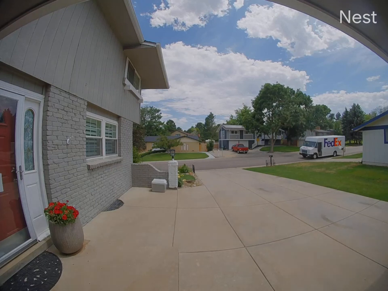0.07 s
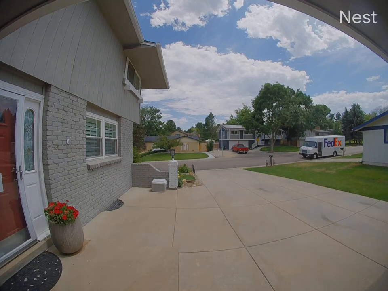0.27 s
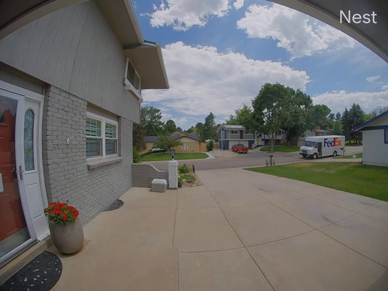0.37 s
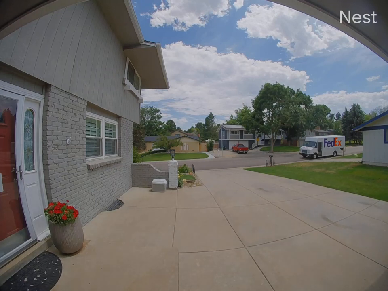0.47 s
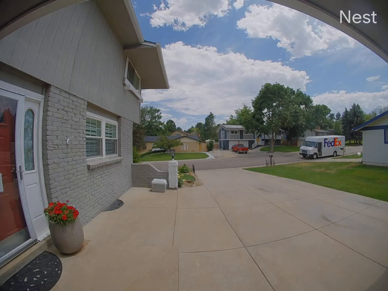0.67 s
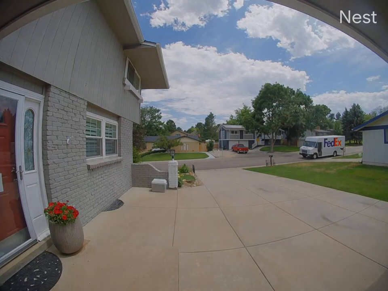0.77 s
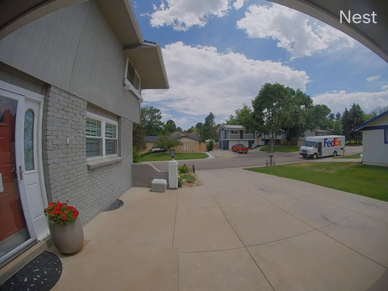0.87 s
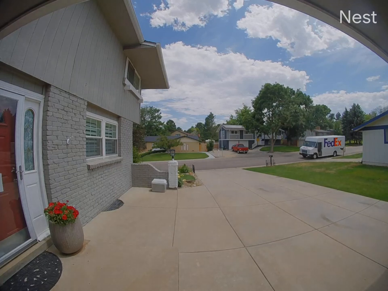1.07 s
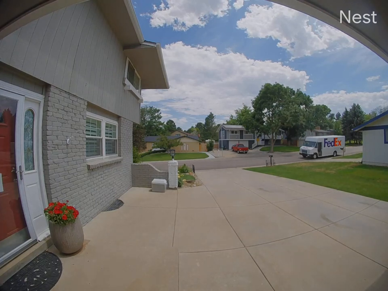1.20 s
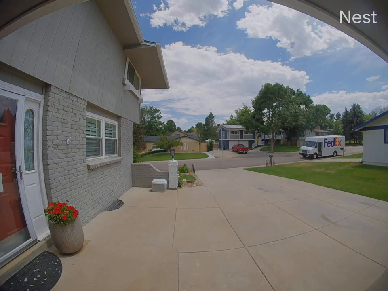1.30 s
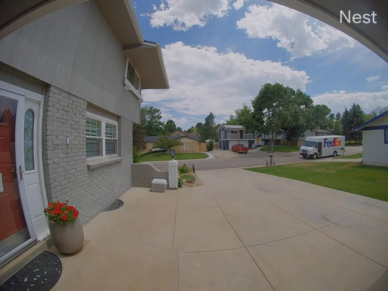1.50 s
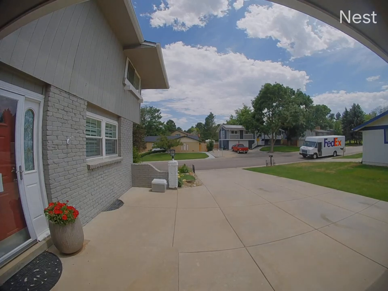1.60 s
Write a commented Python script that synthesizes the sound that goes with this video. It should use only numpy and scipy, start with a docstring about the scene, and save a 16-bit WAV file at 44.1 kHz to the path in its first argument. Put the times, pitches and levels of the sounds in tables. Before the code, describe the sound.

A package drops with a sharp, hollow thud near a house entrance, after a quick run of dull knocks; weaker bumps and short scuffs follow over low outdoor rumble, heard by a small doorway microphone.

```python
"""A package lands with a sharp thud near a house, heard by a small microphone at the front door.
Dull knocks, short swelling tones that excite a hollow body, build up to the hit; weaker ones follow.
The hit adds cracks of grainy noise, a thin ring of decaying modes and a smooth wash of early reflections,
made from filtered noise; scuffs are friction noise. The walls return a diffuse tail of decaying noise,
over an uneven low rumble and faint hiss of filtered noise."""
import sys
import numpy as np
from scipy import signal
from scipy.fft import rfft, irfft
from scipy.io import wavfile
from scipy.ndimage import uniform_filter1d

SR = 44100
rng = np.random.default_rng(int(sys.argv[2]) if len(sys.argv) > 2 else 0)


def transcribe(u):
    """Save the signal u as a 16-bit wav file named by the first command-line argument.

    u: samples, shape (n,) or (channels, n), limited to [-1, 1]; the rate is SR.
    q: integer samples, one column per channel.
    """
    v = np.clip(np.atleast_2d(u).T, -1, 1)
    q = np.round(v * 32767).astype(np.int16)
    wavfile.write(sys.argv[1], SR, q)


N = 72765  # length in samples
T = np.arange(N) / SR  # time in seconds
HZ = np.fft.rfftfreq(N, 1 / SR)  # frequency of each spectral bin


def amp(db):
    """Decibel law: 20 dB is a factor of ten in amplitude."""
    return 10 ** (np.asarray(db) / 20)


def unit(x):
    """Normalisation: scales the mean power, and so the rms, to 1."""
    return x / np.sqrt(np.mean(x ** 2) + 1e-20)


def read(points, hz):
    """Logarithmic interpolation: reads a table along a log-frequency axis."""
    f, value = np.transpose(points)
    return np.interp(np.log(hz + 1), np.log(f + 1), value)


def above_db(hz):
    """Low-pass filtering: the gain in dB of a steep roll-off above hz."""
    return -10 * np.log10(1 + (HZ / hz) ** 10)


def coloured(x, db):
    """Linear filtering: multiplies the spectrum of x by a gain in dB, then sets rms 1."""
    return unit(irfft(rfft(x) * amp(db), N))


def noise(points):
    """Filtered noise: white Gaussian noise shaped by a spectrum table, at rms 1."""
    return coloured(rng.standard_normal(N), read(points, HZ))


def gritty(per_s, share):
    """Shot noise: separate random grains carry a share of the power, smooth white noise the rest."""
    rub, size = rng.standard_normal((2, N))
    grains = unit(size * (rng.random(N) < per_s / SR))
    share = np.clip(share, 0, 1)
    return np.sqrt(1 - share) * rub + np.sqrt(share) * grains


def envelope(s, rise, hold, decay):
    """Amplitude envelope: straight rise, hold, exponential decay."""
    after_hold = np.maximum(T - s - rise - hold, 0)
    return np.clip((T - s) / rise, 0, 1) * np.exp(-after_hold / decay)


def t60_decay(t, t60):
    """Exponential damping: the amplitude falls by 60 dB in t60 seconds."""
    return np.exp(-np.log(1000) * t / t60)


# Spectrum of the steady hiss. Each row: frequency in Hz, relative level per hertz in dB.
HISS_SPECTRUM = [(100, 15.5), (1100, -3), (1600, -4.5), (3300, -6.5), (4500, -9), (6300, -10.5),
                 (7000, -34.5), (8000, -32.5)]
HISS_DB, HISS_START_DB, HISS_RISE_S = -66.5, -14.5, 0.2  # start is relative to the steady level


def hiss():
    """Stationary broadband noise, after a brief initial rise in level."""
    start = HISS_START_DB * np.maximum(1 - T / HISS_RISE_S, 0)
    return noise(HISS_SPECTRUM) * amp(HISS_DB + start)


# Spectrum of the low outdoor rumble. Each row: frequency in Hz, relative level per hertz in dB.
RUMBLE_SPECTRUM = [(25, -24), (60, -49), (100, 6), (220, -2), (350, -13), (600, -20.5), (1200, -24),
                   (2000, -62)]
# Course of the rumble's level before its random swell. Each row: time in seconds, level in dB.
RUMBLE_COURSE = [(0, -69), (.2, -55), (.7, -53), (.88, -54.5), (.96, -63), (1.05, -49.5), (1.35, -50.5),
                 (1.48, -56), (1.65, -50.5)]
RUMBLE_SWELL_DB = 3.5  # rms of the random swell


def rumble():
    """Amplitude-modulated low noise: its level follows a set course plus a slow random swell."""
    smooth = uniform_filter1d(rng.standard_normal(N), size=2000)
    swell = unit(uniform_filter1d(smooth, size=2000))
    level_db = np.interp(T, *np.transpose(RUMBLE_COURSE)) + RUMBLE_SWELL_DB * swell
    return noise(RUMBLE_SPECTRUM) * amp(level_db)


# Reverberation from the walls. Each row: frequency in Hz, 60 dB decay time in seconds.
WALL_DECAY = [(100, 0.28), (400, 0.72), (1500, 0.91), (6500, 0.68)]


def walls(x):
    """Diffuse reverberation: convolution with noise whose bands each decay at their own rate."""
    hz, t, z = signal.stft(rng.standard_normal(N), SR, nperseg=256)
    fading = z * t60_decay(t, read(WALL_DECAY, hz)[:, None])
    tail = signal.istft(fading, SR)[1]
    return signal.fftconvolve(x, tail / np.linalg.norm(tail))[:N]


# Spectrum of the wash after the main hit. Each row: frequency in Hz, relative level per hertz in dB.
WASH_SPECTRUM = [(40, -4), (120, 11.5), (400, -5.5), (800, -9), (1100, -13), (1500, -18), (2500, -17.5),
                 (4000, -24), (5500, -28), (6900, -37.5), (7400, -61)]
WASH_S, WASH_RISE_S, WASH_HOLD_S, WASH_DECAY_S = 0.44, 0.006, 0.056, 0.037
WASH_DB = -36.5


def wash():
    """Dense early reflections: a smooth wash of noise holds briefly after the main hit, then dies away."""
    shape = envelope(WASH_S, WASH_RISE_S, WASH_HOLD_S, WASH_DECAY_S)
    return amp(WASH_DB) * shape * noise(WASH_SPECTRUM)


# Scuffs of friction. Each row: start in seconds, rise in seconds, hold in seconds, decay time
# in seconds, level in dB, spectral tilt above the pivot in dB per octave, roll-off frequency in Hz.
SCUFF_EVENTS = [(0.036, 0.051, 0.017, 0.04, -56, -5, 450), (0.211, .025, 0.072, .01, -40.5, -15.5, 750),
                (0.324, 0.002, 0.028, 0.0055, -41, 3.5, 750), (0.526, 0.0058, .045, .03, -40.5, 2.5, 1300),
                (0.975, 0.00059, 0.018, 0.023, -45, 0.5, 5940),
                (0.991, .009, 0.0091, 0.011, -35, 0.5, 6500), (1.008, .01, .05, 0.042, -42, 1, 2300),
                (1.106, 0.0025, 0.031, 0.03, -46, -12.5, 900), (1.148, .02, 0.0093, 0.033, -40, -9.5, 950),
                (1.02, .01, 0.2, 0.05, -68.5, 6, 6000), (1.531, 0.0014, 0.011, 0.0064, -54, 3, 2800),
                (1.543, .005, 0.0081, 0.038, -41.5, 3.5, 1350)]
# Spectrum shared by the scuffs before tilt and roll-off.
# Each row: frequency in Hz, relative level per hertz in dB.
SCUFF_SPECTRUM = [(30, 4.5), (70, -17.5), (120, -2), (200, 15.5), (400, 3), (600, -1), (1000, -7.5),
                  (1500, -17.5), (2400, -19.5), (4000, -24.5), (6500, -29), (7500, -74)]
SCUFF_PIVOT_HZ, SCUFF_GRAINS_PER_S, SCUFF_GRAIN_SHARE = 500, 700, 0.37  # share of power


def scuffs():
    """Dry friction: many small random contacts make grainy noise that swells, holds and dies away."""
    out = np.zeros(N)
    octaves = np.log2(np.maximum(HZ / SCUFF_PIVOT_HZ, 1))
    for s, rise, hold, decay, db, tilt_db, top_hz in SCUFF_EVENTS:
        colour_db = read(SCUFF_SPECTRUM, HZ) + tilt_db * octaves + above_db(top_hz)
        rub = coloured(gritty(SCUFF_GRAINS_PER_S, SCUFF_GRAIN_SHARE), colour_db)
        out += amp(db) * rub * envelope(s, rise, hold, decay)
    return out


# Sharp contacts within the main hit. Each row: start in seconds, level in dB, decay time in seconds.
CRACK_EVENTS = [(0.4011, -30, 0.012), (0.4067, -21.5, 0.0063), (0.412, -31.5, 0.0079), (.419, -27.5, .003),
                (0.4226, -29.5, 0.0076), (0.4296, -21.5, 0.0028)]
# Spectrum of the contacts. Each row: frequency in Hz, relative level per hertz in dB.
CRACK_SPECTRUM = [(30, 5), (100, -0.5), (400, -1), (750, -8.5), (1000, -15.5), (1500, -12.5), (2400, -17),
                  (3500, -16.5), (5000, -28), (6800, -20.5), (7600, -31)]
CRACK_RISE_S, CRACK_GRAINS_PER_S, CRACK_GRAIN_SHARE = 0.00046, 3600, 0.28  # share of power


def cracks():
    """Impulsive contact: edges strike in quick succession, and the powers of their bursts add."""
    power = np.zeros(N)
    for s, db, decay in CRACK_EVENTS:
        t = np.maximum(T - s, 0)
        burst = amp(db) * np.minimum(t / CRACK_RISE_S, 1) * np.exp(-t / decay)
        power += burst ** 2
    grit = gritty(CRACK_GRAINS_PER_S, CRACK_GRAIN_SHARE)
    return np.sqrt(power) * coloured(grit, read(CRACK_SPECTRUM, HZ))


# Modes of the thin ring. Each row: frequency in Hz, starting level in dB, 60 dB decay time in seconds.
RING_MODES = [(803, -40, 0.067), (1083, -48, 0.36), (1426, -42, 0.13), (1515, -45, 0.12),
              (1908, -45.5, 0.17), (2390, -43, 0.11), (2803, -49, .2), (3070, -57, 0.061), (3260, -62, 1.2),
              (3325, -61.5, 1.1), (3340, -57.5, .2), (3540, -62.5, 0.31), (3585, -66, 1.1),
              (3970, -55, 0.45)]


def thin_ring():
    """Modal vibration: the hardest contact starts a set of damped sinusoids."""
    hardest = max(CRACK_EVENTS, key=lambda row: row[1])  # the first, if levels tie
    t = np.maximum(T - hardest[0], 0)
    out = np.zeros(N)
    for hz, db, t60 in RING_MODES:
        out += amp(db) * t60_decay(t, t60) * np.sin(2 * np.pi * hz * t)
    return out


# Resonances of the hollow body. Each row: frequency in Hz, gain at resonance in dB,
# 60 dB decay time in seconds.
BODY_MODES = [(101.2, -1.5, 0.12), (242, -14, 0.043), (383.8, -5, .1), (544, 3, 0.22), (600, -8.5, 0.068),
              (731, -7.5, 0.13), (744, 0, 0.23)]


def hollow_body(blows):
    """Resonance: convolution of the blows with the impulse response of damped modes."""
    response = np.zeros(N)
    for hz, db, t60 in BODY_MODES:
        fade = t60_decay(T, t60)
        # dividing by the sum makes the gain at resonance independent of the decay time
        response += amp(db) * 2 * fade / fade.sum() * np.cos(2 * np.pi * hz * T)
    return signal.fftconvolve(blows, response)[:N]


# Dull thuds before the body adds its ring. Each row: time of the peak in seconds,
# peak level in dB, pitch in Hz, swell time up to the peak in seconds.
THUD_EVENTS = [(0.06, -40.5, 99, 0.039), (0.095, -39, 194.4, 0.0087), (0.102, -33.5, 107, 0.014),
               (.197, -28, 99.3, 0.016), (0.215, -25.5, 180, 0.0027), (.233, -26.5, 210, 0.0091),
               (0.252, -19, 150, 0.0041), (.2635, -42, 530, 0.0014), (0.272, -22.5, 114.6, 0.0068),
               (.297, -29, 233, 0.0033), (0.31, -29, 155, 0.0075), (.319, -38.5, 482, 0.003),
               (0.328, -20, 230, 0.0013), (0.341, -19.5, 183, 0.0033), (0.351, -32, 450, .002),
               (0.3617, -20, 300, 0.0013), (0.3677, -18, 261, 0.0023), (0.381, -27.5, 170, 0.012),
               (.392, -24.5, 181, 0.0036), (0.4087, -22, 280, 0.0029), (.4137, -14, 158, .004),
               (0.4197, -13.5, 380, 0.00065), (.4248, -9.5, 300, 0.0018), (.4328, -17.5, 365, 0.0039),
               (.442, -25.5, 100, 0.0064), (.496, -31, 580, 0.0017), (0.511, -26, 210, 0.0064),
               (.523, -17.5, 224, 0.0048), (.531, -22.5, 133.5, 0.011), (0.5382, -28, 250, 0.0057),
               (.552, -18, 105, 0.0056), (.600, -33, 190, 0.0023), (0.684, -38.5, 99, 0.0041),
               (0.723, -39.5, 120.4, 0.005), (0.801, -47, 184, .005), (0.853, -42, 111, 0.0065),
               (0.873, -54.5, 310, 0.0065), (1.0055, -31, 110.5, 0.0043), (1.006, -33.5, 355, 0.0011),
               (1.0177, -35.5, 373, 0.005), (1.0495, -22.5, 151.7, 0.0095), (1.0717, -27.5, 140, 0.0086),
               (1.1699, -30, 141.3, 0.0048), (1.180, -26, 146, 0.0024), (1.195, -30, 197.4, 0.0027),
               (1.203, -35, 124.5, 0.013), (1.257, -41.5, 109, 0.0052), (1.322, -41, 148, 0.0041),
               (1.402, -36.5, 170, 0.0042), (1.554, -26, 197, 0.0017), (1.5596, -39, 127, 0.0042),
               (1.569, -32.5, 117, 0.0082), (1.637, -43, 205, 0.0065)]
THUD_TOP_HZ = 770  # roll-off frequency


def thuds():
    """Forced and free vibration: each blow is a brief swelling tone that sets the hollow body ringing."""
    blows = np.zeros(N)
    for s, db, hz, swell in THUD_EVENTS:
        u = np.maximum((T - s) / swell + 1, 0)  # 0 at the onset, 1 at the peak
        shape = (u * np.exp(1 - u)) ** 2
        blows += amp(db) * shape * np.cos(2 * np.pi * hz * (T - s))
    return irfft(rfft(blows + hollow_body(blows)) * amp(above_db(THUD_TOP_HZ)), N)


THUD_WET_DB, CRACK_WET_DB = -21.5, -18  # levels sent to the walls


def scene():
    """Superposition: direct sounds, their reflections and the background add linearly."""
    low = thuds()
    sharp = cracks() + thin_ring()
    tail = walls(amp(THUD_WET_DB) * low + amp(CRACK_WET_DB) * sharp)
    background = rumble() + hiss()
    return (low + sharp + wash() + scuffs() + tail + background)[None]


LOW_CUT_HZ, LOW_LEAK_DB, EDGE_HZ = 91.1, -13.5, 7600  # the leak is the gain left in the deep bass


def record(dry):
    """Band limitation: a small microphone passes little deep bass and nothing far above its upper edge."""
    passed = 1 / (1 + (LOW_CUT_HZ / (HZ + 1)) ** 12)
    thin = irfft(rfft(dry) * (passed + amp(LOW_LEAK_DB) * (1 - passed)), N)
    low_pass = signal.firwin(401, EDGE_HZ, window=("kaiser", 9), fs=SR)
    return signal.oaconvolve(thin, low_pass[None], "same")


dry = scene()
out = record(dry)
transcribe(out)
```